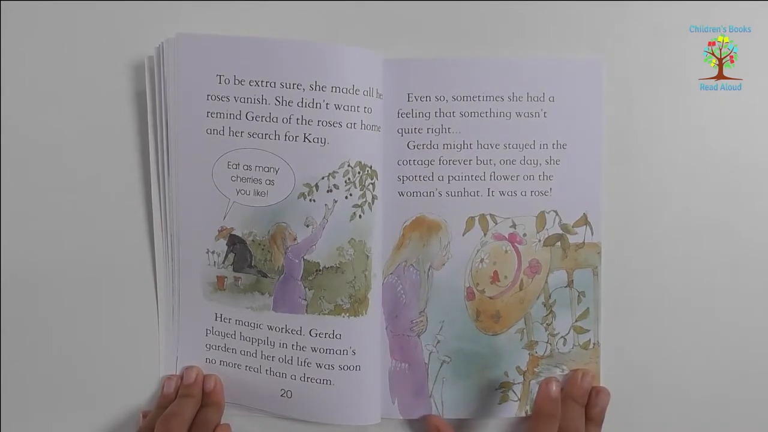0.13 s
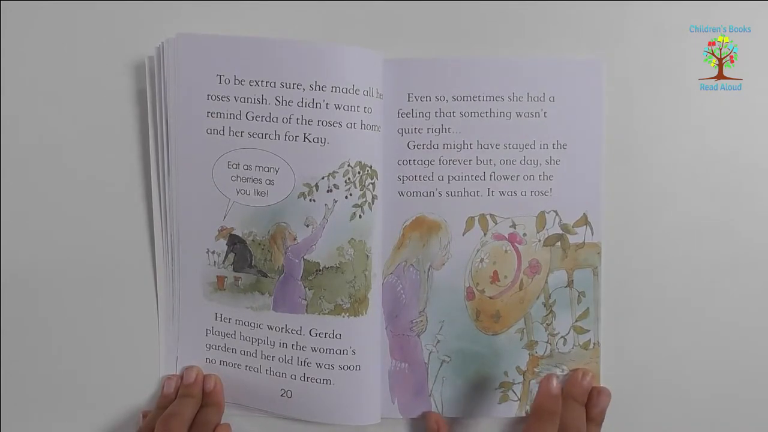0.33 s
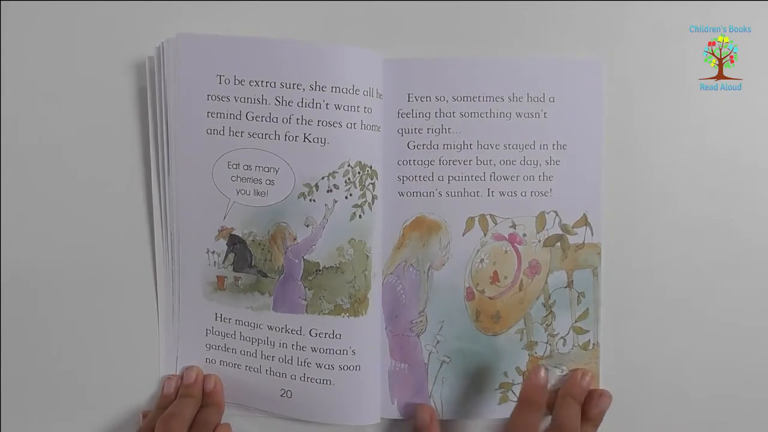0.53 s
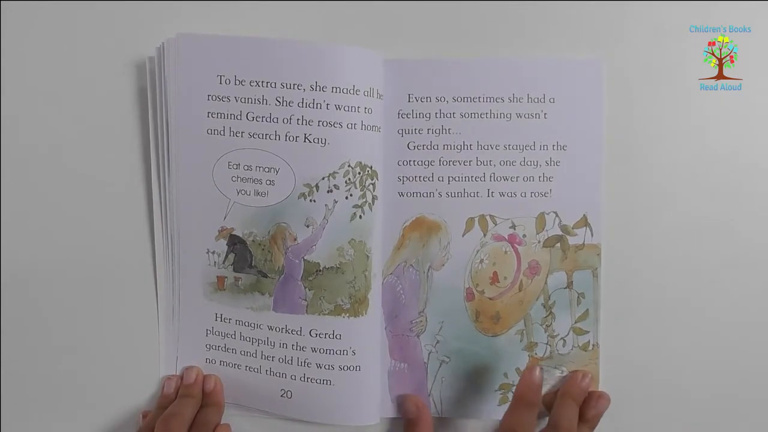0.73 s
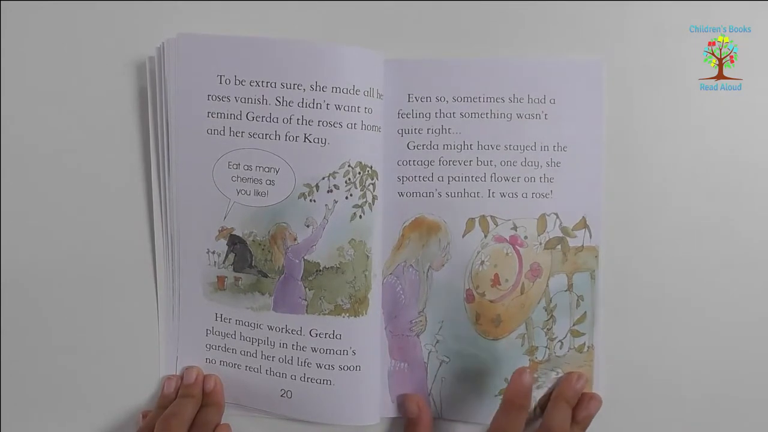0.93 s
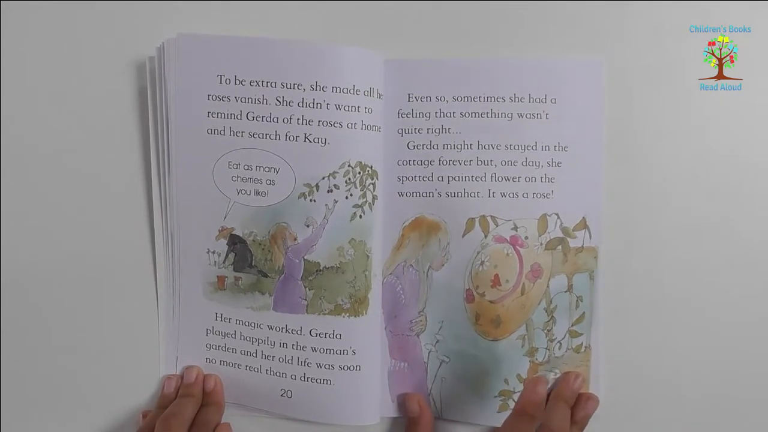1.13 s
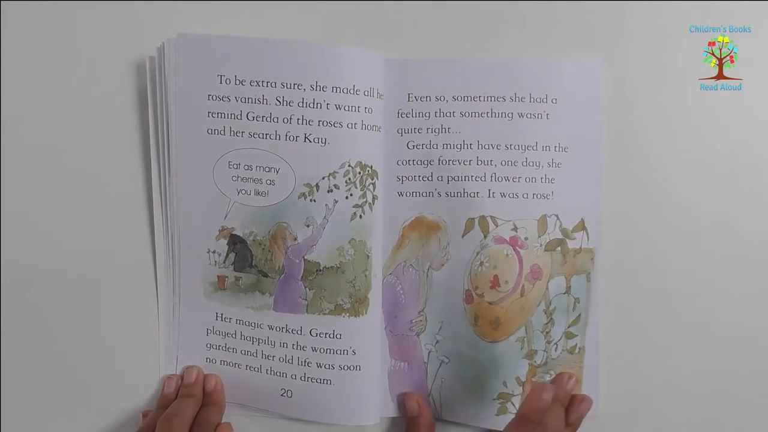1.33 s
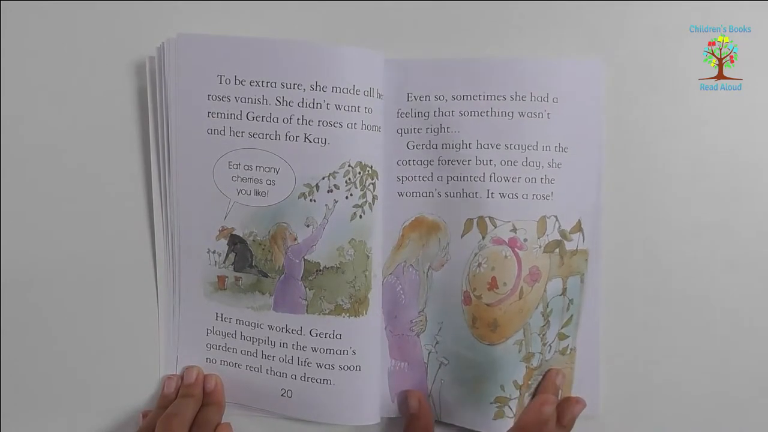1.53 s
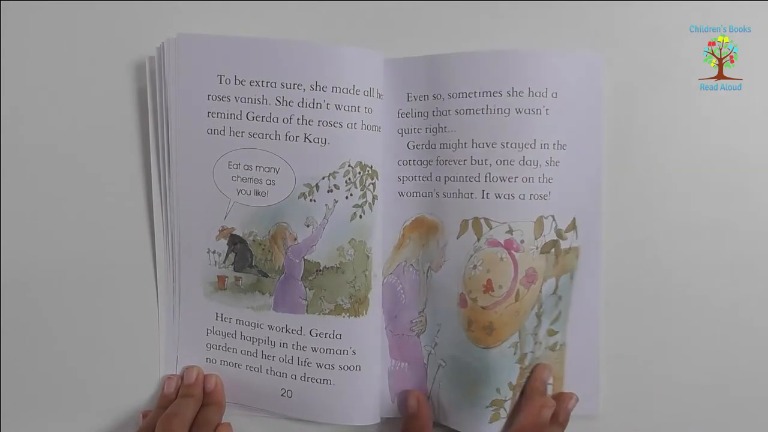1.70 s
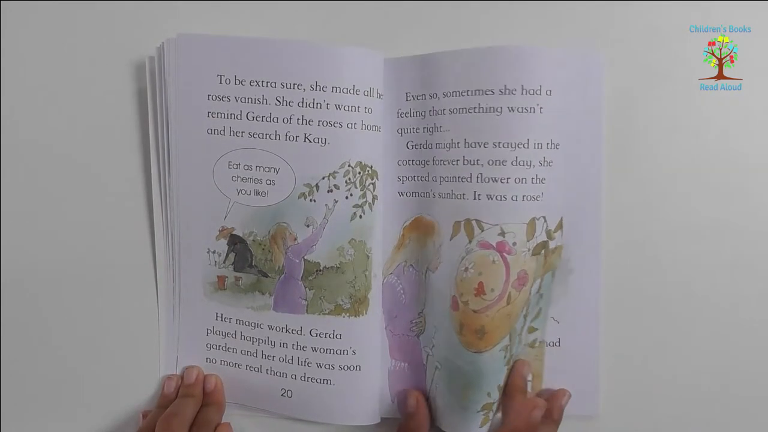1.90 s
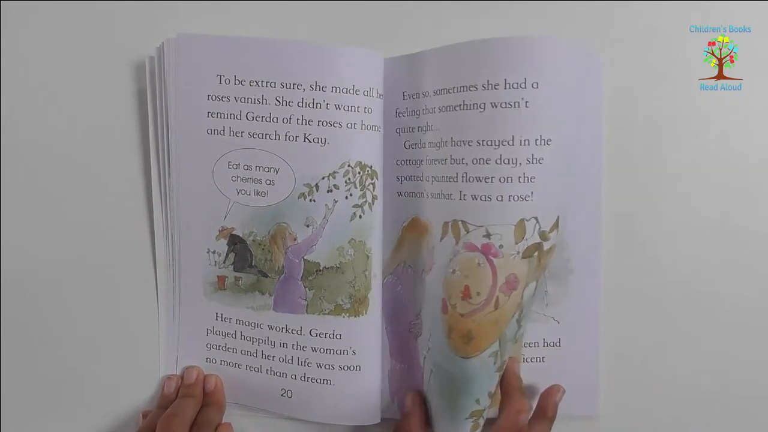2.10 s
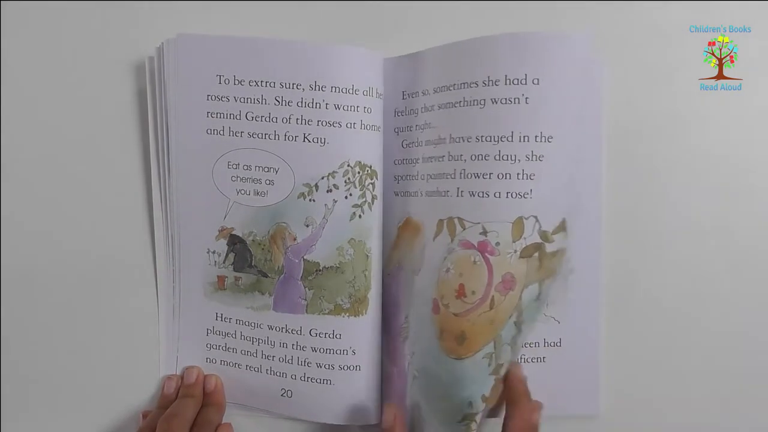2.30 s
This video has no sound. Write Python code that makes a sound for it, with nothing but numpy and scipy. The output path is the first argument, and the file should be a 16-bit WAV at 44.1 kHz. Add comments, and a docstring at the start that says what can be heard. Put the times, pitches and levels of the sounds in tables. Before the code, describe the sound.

A paperback page being turned: finger ticks, croaky rubbing strokes, then a bright papery sliding hiss

```python
"""In a quiet room, a page of a paperback is turned close to the microphone.
A finger ticks on the paper (damped thumps with crackle) and brushes along its edge (coloured grain noise),
then drags over the page in stick-slip strokes: pulses that drive the sheet's resonances and make it croak.
The lifted sheet slides over the page below with a bright hiss of dense grains and gliding resonances.
Steady noise makes a low room rumble, air and microphone hiss; faint sines make a brief whine."""
import sys
import numpy as np
from scipy import signal
from scipy.fft import rfft, irfft
from scipy.io import wavfile

SR = 44100
rng = np.random.default_rng(int(sys.argv[2]) if len(sys.argv) > 2 else 0)


def log_audio(samples):
    """Write samples as a 16-bit WAV file to the path given in sys.argv[1]."""
    # one column per channel
    frames = np.atleast_2d(samples).T
    # limit to full scale, then quantise
    limited = np.clip(frames, -1, 1)
    pcm = np.round(limited * 32767).astype(np.int16)
    wavfile.write(sys.argv[1], SR, pcm)


N = 103811
TIME = np.arange(N) / SR  # s
FFT_SIZE = 2 ** 17
PAPER_LOW_CUT_HZ = 143

# Grain of paper sliding on paper: rate_per_s, spread_db
PAPER_GRAINS = (14000, 2.6)
# Grain of skin sliding on paper: rate_per_s, spread_db
SKIN_GRAINS = (5000, 2.55)


def from_db(db):
    """Logarithmic level: 20 dB is a factor of ten in amplitude."""
    return 10 ** (np.asarray(db) / 20)


def rms_one(x):
    """Power normalisation: scale a signal to unit rms."""
    return x / np.sqrt(np.mean(x ** 2) + 1e-20)


def levels(rows):
    """Amplitude envelopes: one gain curve per dB column, linear in dB, silent outside the rows."""
    s, *columns = np.transpose(rows)
    return [from_db(np.interp(TIME, s, column, left=-200, right=-200)) for column in columns]


def gains(points):
    """Magnitude response: a spectrum's gain at every FFT bin, interpolated in dB over log frequency."""
    hz, db = np.transpose(points)
    bin_hz = np.arange(FFT_SIZE // 2 + 1) * SR / FFT_SIZE
    return from_db(np.interp(np.log(bin_hz + 1), np.log(hz), db))


def colour(x, points):
    """Minimum-phase filtering: folding the cepstrum makes the given magnitude response causal."""
    cepstrum = irfft(np.log(gains(points)))
    cepstrum[1:FFT_SIZE // 2] *= 2
    cepstrum[FFT_SIZE // 2 + 1:] = 0
    response = np.exp(rfft(cepstrum))
    return irfft(rfft(x, FFT_SIZE) * response)[..., :N]


def low_cut(x, hz):
    """Acoustic short circuit: a small sheet radiates almost no bass."""
    return signal.sosfilt(signal.butter(2, hz, "high", fs=SR, output="sos"), x)


def resonate(x, modes):
    """Modal coloration: each mode lifts or dips a narrow band around its frequency."""
    out = x
    for hz, width_hz, boost_db in modes:
        band = signal.lfilter(*signal.iirpeak(hz, hz / width_hz, fs=SR), x)
        out = out + (from_db(boost_db) - 1) * band
    return out


def drift(rate):
    """Random modulation: a wander of unit rms through `rate` random points per second."""
    return rms_one(np.interp(TIME * rate, np.arange(N), rng.standard_normal(N)))


def grains(per_s, spread_db):
    """Asperity friction: catching fibres give dense clicks of uneven size whose level flutters."""
    flutter_db, flutter_rate = 1, 67  # rms, random points per s
    born = rng.random(N) < per_s / SR
    unevenness = np.minimum(rng.exponential(1, N), 5)
    sizes = from_db(spread_db * unevenness + flutter_db * drift(flutter_rate))
    return born * sizes * rng.choice([-1, 1], N)


def stereo_noise(spectrum, db, likeness, pan_db=0):
    """Interchannel coherence: steady noise whose left and right correlate by `likeness`."""
    mid, side = rng.standard_normal((2, N))
    pair = np.sqrt(1 + likeness) * mid + np.sqrt(1 - likeness) * np.array([side, -side])
    channel_db = [[db + pan_db / 2], [db - pan_db / 2]]
    return from_db(channel_db) * rms_one(colour(pair, spectrum))


def background():
    """Superposition of incoherent noises: low rumble, near-mono air and the microphone's self-noise."""
    # Spectrum of the low room rumble: freq_hz, level_db
    rumble_spectrum = [(20, -11), (38, -6.5), (75, -2.5), (105, -11.5), (137, 6.5), (165, -2.5),
                       (210, -2.5), (300, -10), (450, -16), (900, -18), (1600, -37.5), (4000, -68)]
    # Spectrum of the air noise: freq_hz, level_db
    air_spectrum = [(500, 1.5), (2000, 1), (2700, -6.5), (3800, -1), (5200, -7.5), (6300, -3.5), (7600, 5),
                    (10000, -1.5), (13000, -1.5), (16000, -2)]
    # Spectrum of the microphone's self-noise: freq_hz, level_db
    mic_spectrum = [(500, -6), (1500, -9), (3000, -20), (5200, -17), (7000, 8), (9000, 10), (13000, 12),
                    (16000, 4.5)]
    rumble = stereo_noise(rumble_spectrum, db=-62, likeness=0.062, pan_db=2.5)
    air = stereo_noise(air_spectrum, db=-71.5, likeness=0.98)
    mic_hiss = stereo_noise(mic_spectrum, db=-76.5, likeness=0)
    return rumble + air + mic_hiss


def whine():
    """Superposition of steady sines: a faint, thin, high tone comes and goes."""
    # Partials of the whine: freq_hz, rms_db before the spell's gain
    partials = [(7160, -73), (8592, -78), (10029, -87)]
    # When the whine sounds: start_s, end_s, gain_db
    spells = [(0.095, 0.294, 0), (1.60, 1.732, 4)]
    fade_s = 0.028
    gate, tone = np.zeros(N), np.zeros(N)
    for start, end, db in spells:
        nearest_end_s = np.minimum(TIME - start, end - TIME)
        gate += from_db(db) * np.clip(nearest_end_s / fade_s, 0, 1)
    for hz, db in partials:
        tone += np.sqrt(2) * from_db(db) * np.sin(2 * np.pi * hz * TIME)
    return gate * tone


def ticks():
    """Impact response: each tap is a damped thump of the page at its own pitch, with a short crackle."""
    # Taps and snaps of the paper: start_s, thump_hz, thump_db, crackle_db, crackle_length_s
    taps = [(0.451, 930, -50.5, -63, .006), (0.458, 800, -50.5, -68, .004), (.463, 890, -71, -58, .004),
            (.531, 910, -50, -38.5, 0.0018), (.5322, 852, -32, -46.5, 0.0032),
            (0.539, 690, -57, -66.5, .045), (1.0165, 602, -45, -56, 0.0013),
            (1.0264, 3110, -42.5, -63, .001), (1.0267, 437, -37.5, -51, .0014),
            (1.1714, 747, -29.5, -47, 0.0034), (1.3445, 700, -42, -47.5, 0.00098),
            (1.4121, 795, -41, -53, 0.0023), (1.419, 740, -37.5, -46, 0.0013),
            (1.427, 1100, -44, -42, 0.0014), (1.598, 910, -36.5, -42, .0013),
            (1.614, 810, -47, -47, 0.0032), (1.644, 1020, -58, -50.5, 0.0099),
            (1.735, 1300, -44, -40, 0.0016), (1.742, 785.4, -35.5, -41, 0.0021),
            (1.762, 840, -34.5, -44, 0.003)]
    # Spectrum of the crackle: freq_hz, level_db
    crackle_spectrum = [(300, -22), (1500, -7), (2500, -18), (3400, 0), (3900, 0), (4500, -13), (6400, -14),
                        (7500, 5), (8300, -2), (11000, -8), (13000, -17), (16000, -23)]
    rise_s = 0.00068  # the thump's envelope peaks here
    thumps, crackle_gain = np.zeros(N), np.zeros(N)
    for s, hz, thump_db, crackle_db, length_s in taps:
        at = int(s * SR)
        age = TIME[:N - at]
        envelope = age / rise_s * np.exp(1 - age / rise_s)
        thumps[at:] -= from_db(thump_db) * envelope * np.sin(2 * np.pi * hz * age)
        crackle_gain[at:] += from_db(crackle_db) * np.exp(-(age / length_s) ** 2)
    crackle = colour(crackle_gain * rng.standard_normal(N), crackle_spectrum)
    filter_rms = np.sqrt(np.mean(gains(crackle_spectrum) ** 2))
    return thumps + crackle / filter_rms


def flaps():
    """Air displacement: the loose page pushes a soft, low puff of air against the book."""
    # Soft flaps of the page: start_s, peak_rms_db
    puffs = [(0.481, -58.5), (1.015, -58), (1.223, -53.5), (1.813, -56.5)]
    # Spectrum of the puffs: freq_hz, level_db
    puff_spectrum = [(80, -23), (150, -3), (230, 1), (360, -4), (600, -18), (1200, -22.5), (4000, -42)]
    rise_s = 0.0099
    swell = np.zeros(N)
    for s, db in puffs:
        age = np.maximum(TIME - s, 0) / rise_s
        swell += from_db(db) * age * np.exp(1 - age)
    return swell * rms_one(colour(rng.standard_normal(N), puff_spectrum))


def edge_brush():
    """Friction noise: a finger swishes lightly along the page edge, which sings hoarsely."""
    # Brush along the page edge: time_s, swish_db, edge_resonance_db
    brush = [(.90, -78, -88), (.928, -57.5, -60.5), (.95, -52.5, -50.5), (.973, -48, -43.5),
             (1.0, -47, -49), (1.02, -48, -60), (1.027, -60, -77)]
    # Spectrum of the swish: freq_hz, level_db
    swish_spectrum = [(100, -21), (300, -4.5), (780, 2), (1030, -5), (2100, -6.5), (4050, -3.5),
                      (5000, -20), (6300, -10.5), (7700, -5), (8700, -14), (10500, -11.5), (13000, -24),
                      (16000, -38)]
    # Spectrum of the rubbed edge of the sheet: freq_hz, level_db
    edge_spectrum = [(1500, -49), (2750, -15), (3420, 0.5), (4000, -4), (4800, -20), (8000, -40)]
    swish_gain, edge_gain = levels(brush)
    swish = rms_one(colour(grains(*SKIN_GRAINS), swish_spectrum))
    edge = rms_one(colour(grains(*PAPER_GRAINS), edge_spectrum))
    return swish_gain * swish + edge_gain * edge


def slips():
    """Stick-slip relaxation: uneven pulses at the finger's rate, with constant mean power."""
    # Slip rate, which follows the speed of the finger: time_s, rate_per_s
    slip_rate = [(1.18, 838), (1.213, 965), (1.232, 270), (1.243, 231), (1.258, 956), (1.285, 1504),
                 (1.305, 1686), (1.33, 1148), (1.341, 290), (1.438, 285), (1.452, 750), (1.472, 1100),
                 (1.50, 1100), (1.514, 320), (1.533, 370), (1.56, 760), (1.585, 473), (1.74, 186),
                 (1.80, 450)]
    interval_jitter, spread_db = .15, 2.3  # jitter in natural log of the interval
    rate = np.interp(TIME, *np.transpose(slip_rate))
    chance = rng.standard_normal((N // 20, 2))
    due = np.cumsum(np.exp(interval_jitter * chance[:, 0]))  # counted in mean slips
    at = np.searchsorted(np.cumsum(rate) / SR, due)
    pulses = np.zeros(N + 1)  # the extra place takes slips due after the end
    pulses[at] = from_db(spread_db * chance[:, 1])
    return pulses[:N] / np.sqrt(rate)


def finger_strokes():
    """Stick-slip excitation: each slip knocks the resonant sheet and frees a burst of friction hiss."""
    # Finger strokes, one list each: time_s, slip_db, hiss_db
    strokes = [
        [(1.172, -49.5, -63), (1.184, -51.5, -53.5), (1.205, -49.5, -55), (1.228, -44.5, -57.5),
         (1.25, -48.5, -59.5), (1.29, -41.5, -50), (1.32, -40, -48), (1.344, -44.5, -59), (1.353, -63, -63),
         (1.40, -69, -80)],
        [(1.414, -49, -66), (1.431, -39.5, -54), (1.455, -38.5, -48.5), (1.475, -36.5, -47), (1.497, -36, -46),
         (1.525, -39, -49), (1.565, -37, -47), (1.59, -39, -46.5), (1.615, -63, -55), (1.628, -53, -76)],
        [(1.734, -54, -56), (1.746, -42, -52), (1.772, -51.5, -75), (1.79, -73, -63), (1.818, -47, -77),
         (1.845, -91, -70)],
    ]
    # The sheet's response to slips, one list per stroke: freq_hz, level_db
    sheet_responses = [
        [(100, -22), (250, -0.5), (420, -5.5), (720, 0), (1300, -4.5), (1900, -8), (2500, -4), (3100, -13.5),
         (5000, -22), (15000, -61)],
        [(100, -7.5), (300, -11), (480, -4.5), (730, 1.5), (1100, 3), (1600, -6.5), (2200, -6), (3000, -22),
         (5000, -25), (15000, -50)],
        [(100, -33), (300, -6.5), (500, -9), (780, 4.5), (1150, -4.5), (1500, -12), (2100, -6), (3000, -26),
         (5000, -64), (15000, -76)],
    ]
    # Spectrum of the hiss of skin on paper: freq_hz, level_db
    friction_spectrum = [(1500, -20), (2800, -10), (3600, 1), (4450, 1), (5000, -15), (6200, -6),
                         (7400, 5.5), (8300, 1.5), (9200, 0.5), (10700, -4.5), (12500, -15.5), (16000, -29)]
    burst_s, burst_share = 0.00092, 0.3  # decay constant; share of the grain gain that follows slips
    pulses = slips()
    bursts = rms_one(signal.lfilter([1], [1, -np.exp(-1 / (burst_s * SR))], pulses))
    grain_gain = 1 - burst_share + burst_share * bursts
    hiss = rms_one(colour(grains(*SKIN_GRAINS) * grain_gain, friction_spectrum))
    knocks = low_cut(pulses, PAPER_LOW_CUT_HZ)
    out = np.zeros(N)
    for stroke, response in zip(strokes, sheet_responses):
        slip_gain, hiss_gain = levels(stroke)
        out += slip_gain * rms_one(colour(knocks, response)) + hiss_gain * hiss
    return out


def gliding_resonance(rows, width_hz, size=128):
    """Time-varying resonance: paper grains ring in two equal band-passes whose pitch and level move."""
    s, hz, db = np.transpose(rows)
    x, out, state = grains(*PAPER_GRAINS), np.zeros(N), np.zeros(4)
    for i in range(0, N, size):
        centre_hz = np.interp(i / SR, s, hz)
        b, a = signal.iirpeak(centre_hz, centre_hz / width_hz, fs=SR)
        b_twice, a_twice = np.convolve(b, b), np.convolve(a, a)
        out[i:i + size], state = signal.lfilter(b_twice, a_twice, x[i:i + size], zi=state)
    gain = levels(np.transpose([s, db]))[0]
    return gain * rms_one(out)


def sheet_slide():
    """Sliding friction: paper on paper rustles and hisses while resonances of sheet and edge glide."""
    # The sheet sliding over the page below: time_s, rustle_db, hiss_db
    slide = [(1.60, -64, -72), (1.66, -67, -71), (1.70, -67, -62.5), (1.725, -57.5, -60), (1.76, -58, -49),
             (1.795, -55.5, -46), (1.845, -54, -51), (1.91, -54.5, -44), (1.98, -49, -43),
             (2.03, -52, -43.5), (2.085, -56, -42.5), (2.16, -56.5, -53.5), (2.255, -58.5, -54.5),
             (2.283, -57, -50.5), (2.35, -57.5, -55.5)]
    # Spectrum of the rustle: freq_hz, level_db
    rustle_spectrum = [(100, -9), (380, -9.5), (640, 5), (850, -3.5), (1150, 4), (2200, -3.5), (3000, -13),
                       (6000, -46)]
    # Spectrum of the bright hiss: freq_hz, level_db
    hiss_spectrum = [(1500, -17), (2700, -13.5), (3750, -2.5), (4350, -3.5), (4900, -11), (6100, -11.5),
                     (7200, 1), (8300, 0), (9400, -5), (10200, -10.5), (11500, -13), (12700, -20),
                     (16000, -30)]
    # The sheet's resonance, rising as it arches: time_s, pitch_hz, level_db
    arch_glide = [(1.85, 750, -64), (1.875, 900, -50.5), (1.915, 1200, -46.5), (1.98, 1290, -51.5),
                  (2.06, 1300, -64)]
    # The edge's resonance, sinking overall as the sheet slides off: time_s, pitch_hz, level_db
    edge_glide = [(1.88, 4100, -62), (1.97, 3650, -50), (2.11, 3480, -50), (2.19, 3540, -60),
                  (2.35, 3340, -61.5)]
    rustle_gain, hiss_gain = levels(slide)
    rustle = rustle_gain * rms_one(colour(grains(*PAPER_GRAINS), rustle_spectrum))
    hiss = hiss_gain * rms_one(colour(grains(*PAPER_GRAINS), hiss_spectrum))
    arch = gliding_resonance(arch_glide, width_hz=660)
    edge = gliding_resonance(edge_glide, width_hz=1230)
    return rustle + hiss + arch + edge


def with_echo(x):
    """Specular reflection: a nearby surface sends back one delayed, duller copy."""
    delay_s, echo_db, cut_hz = 0.01, -19, 13000
    dull = signal.lfilter(*signal.butter(1, cut_hz, fs=SR), x)
    return x + from_db(echo_db) * np.interp(TIME - delay_s, TIME, dull, left=0)


def room(x):
    """Diffuse reverberation: convolution with a short decaying noise tail, different on each side."""
    # Spectrum of the room reflections: freq_hz, gain_db
    room_spectrum = [(100, -0.5), (350, -2.5), (900, -8.5), (2000, -11), (4000, -20), (8000, -25),
                     (15000, 6)]
    t60_s, delay_s = 0.28, 0.0026  # time to fall 60 dB; wait before the tail
    decay = from_db(-60 * TIME / t60_s) * (TIME > delay_s)
    tail = rng.standard_normal((2, N)) * decay
    unit_energy = tail / np.sqrt(np.sum(tail ** 2) / 2)
    tail = colour(unit_energy, room_spectrum)
    return signal.fftconvolve(x[None], tail, axes=1)[:, :N]


def scene():
    """Source, resonator and room in series: paper rings in book and room, its low notes leaning left."""
    # Resonances of the open book: freq_hz, width_hz, boost_db
    book_modes = [(530, 17, -2), (740, 15, 1.5), (1060, 24, 4), (1383, 51, 3), (2200, 45, -2.5)]
    # Left minus right level of the paper's direct sound: freq_hz, difference_db
    balance = [(100, 24), (300, 9.5), (550, 7), (1100, 5), (2200, 5), (3600, 1.5), (8000, -0.3)]
    paper = ticks() + flaps() + edge_brush() + finger_strokes() + sheet_slide()
    paper = with_echo(resonate(low_cut(paper, PAPER_LOW_CUT_HZ), book_modes))
    lean = np.sqrt(gains(balance))  # half the difference goes to each side
    direct = irfft(rfft(paper, FFT_SIZE) * np.array([lean, 1 / lean]))[:, :N]
    return direct + room(paper) + background() + whine()


def record(dry):
    """Transducer response: the microphone dips in the treble, and a steep low-pass cuts the top."""
    # Dip in the microphone's treble: freq_hz, width_hz, boost_db
    mic_modes = [(4990, 980, -3)]
    cutoff_hz = 15900
    heard = resonate(dry, mic_modes)
    # Order 12, 0.1 dB ripple, 80 dB rejection
    return signal.sosfilt(signal.ellip(12, .1, 80, cutoff_hz, fs=SR, output="sos"), heard)


dry = scene()
out = record(dry)
log_audio(out)
```